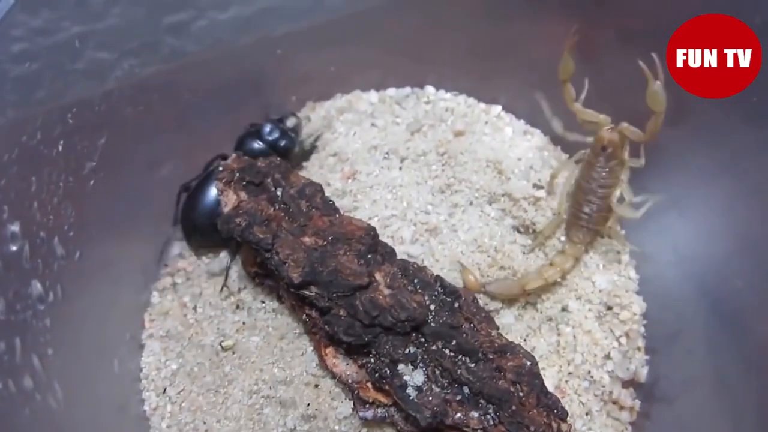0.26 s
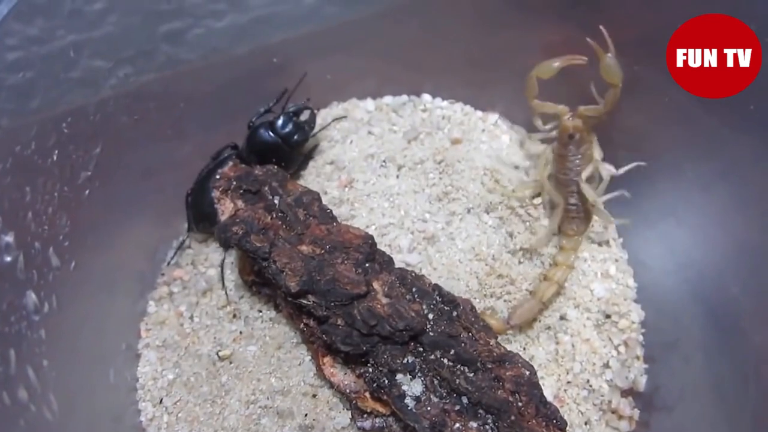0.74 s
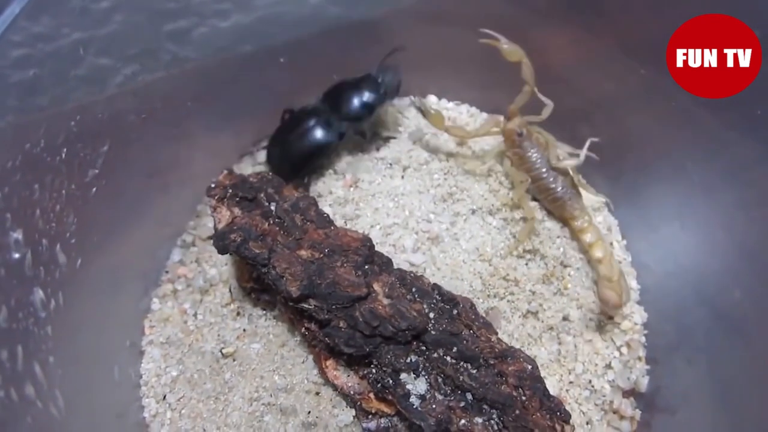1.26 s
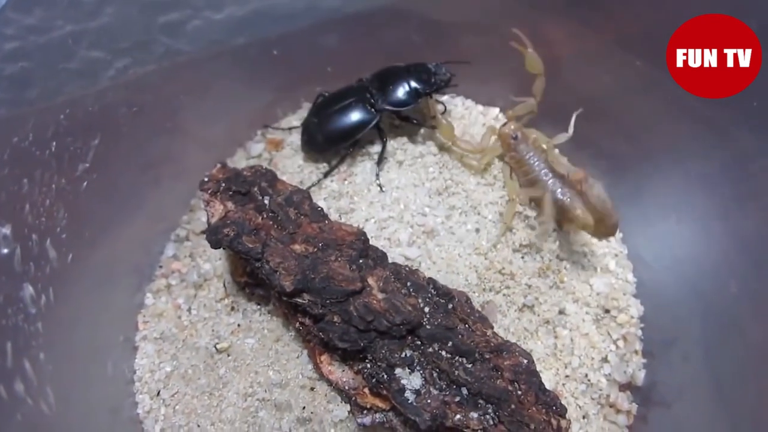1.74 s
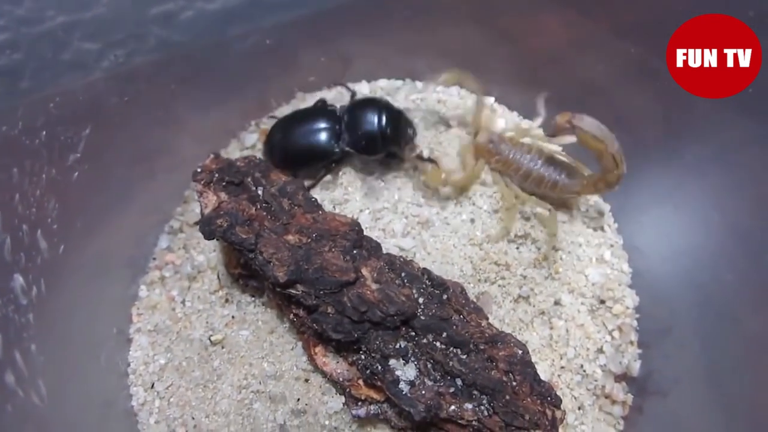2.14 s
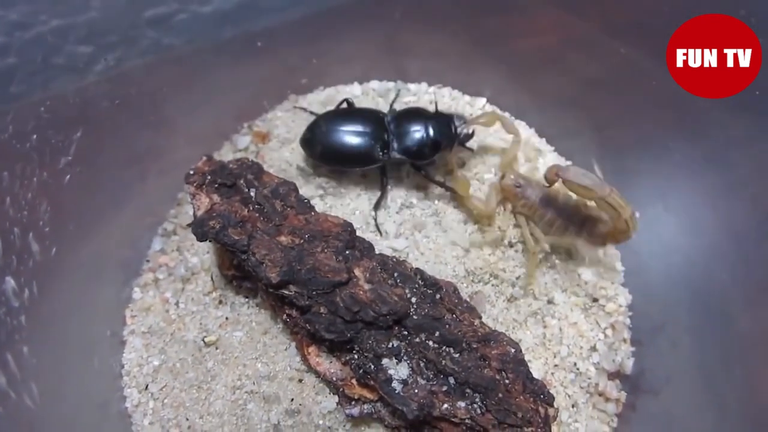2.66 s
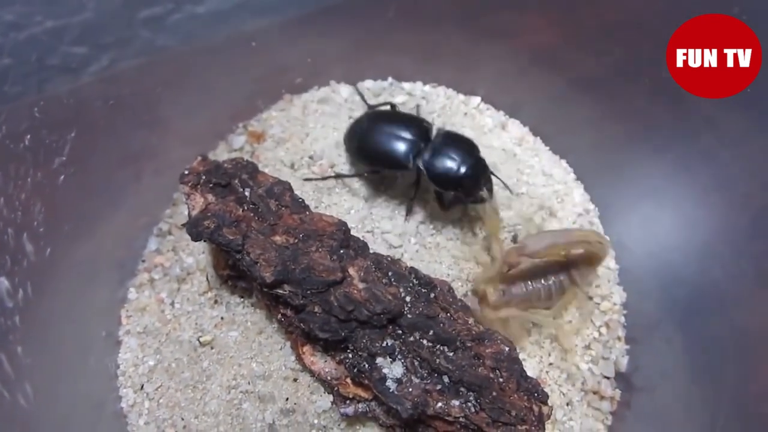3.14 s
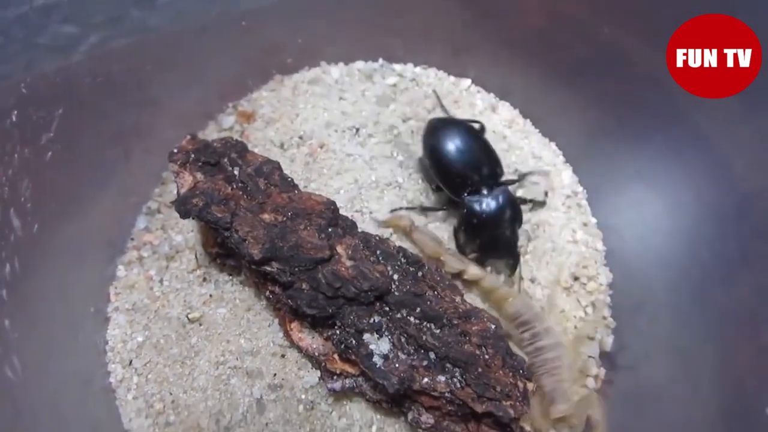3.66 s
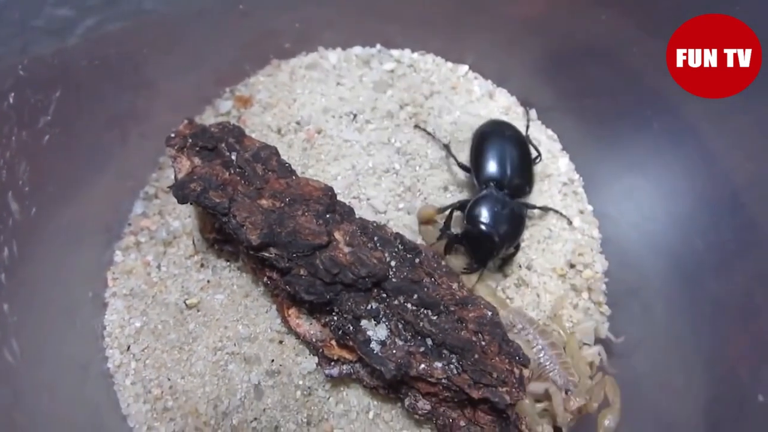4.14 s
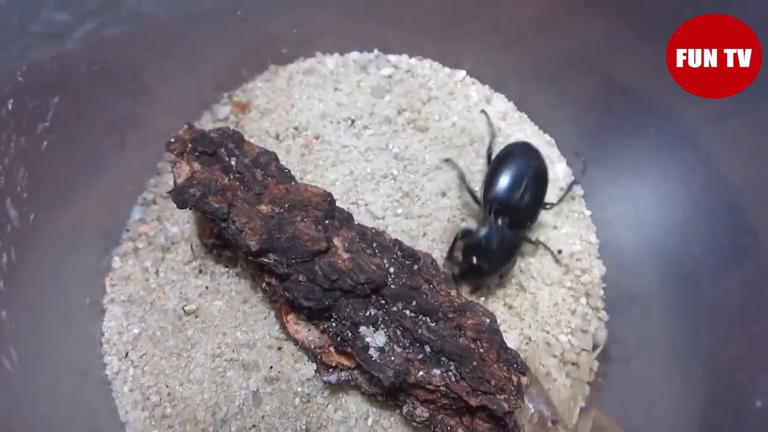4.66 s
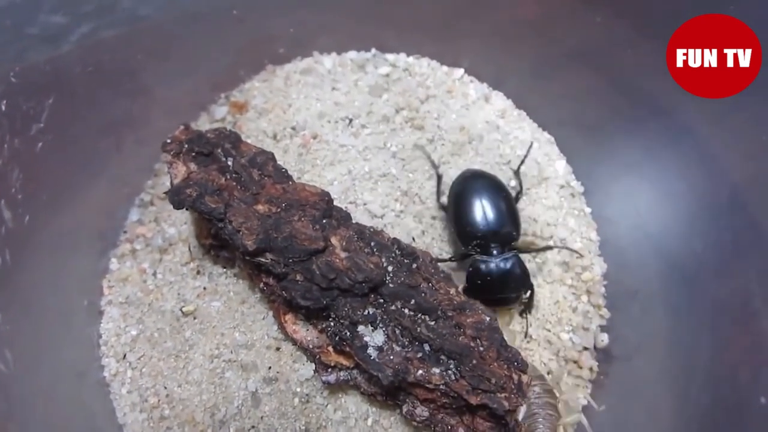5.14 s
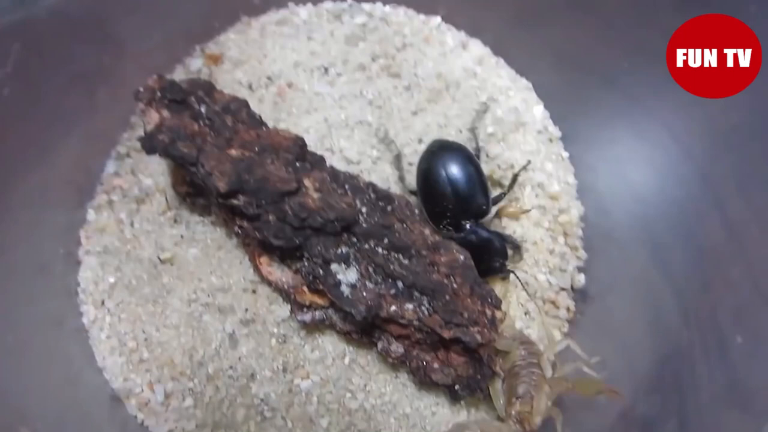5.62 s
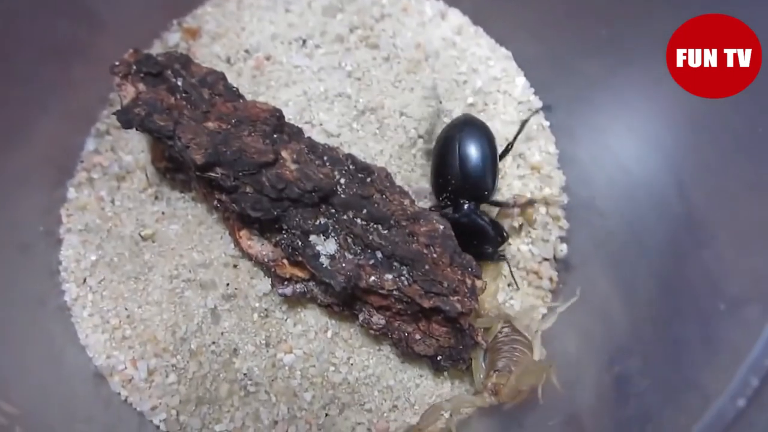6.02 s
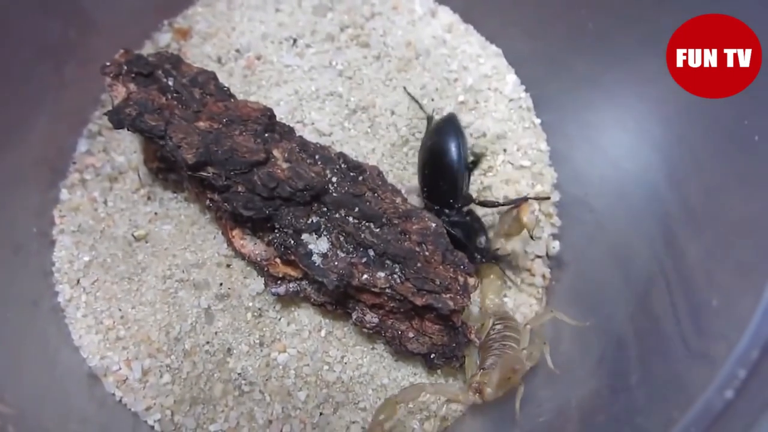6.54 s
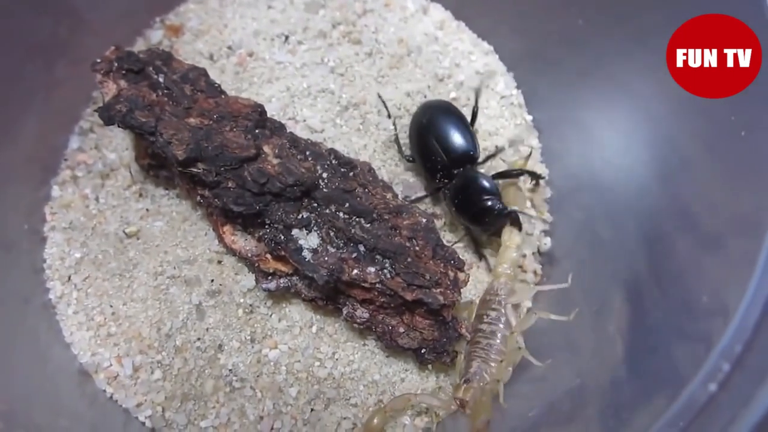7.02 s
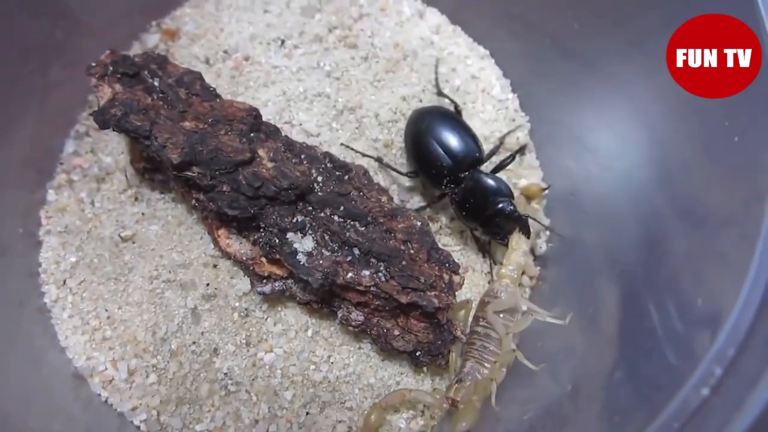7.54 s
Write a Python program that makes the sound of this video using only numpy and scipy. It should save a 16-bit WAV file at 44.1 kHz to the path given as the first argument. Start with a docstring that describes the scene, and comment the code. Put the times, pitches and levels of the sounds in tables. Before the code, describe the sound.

Tiny claws and hard shells tick, scrape and crackle in a rapid flurry, then sparser sandy scratches, above a soft boomy room drone.

```python
"""A plastic tub of sand in a small room, microphone close: a beetle on bark, then a scuffle with a scorpion.
Legs drag as clumps of tiny random slips; claws and shells tick as short decaying tones with a noisy rattle.
Random slips also make the crackle of the shuffling, the singing sand and the hollow rub of the bark.
Bumps ring the tub wall as decaying modes.
Behind, a fan's rush and boom and a little hiss are coloured noise, and an electric whine is wavering sines."""
import sys
import numpy as np
from scipy import signal
from scipy.fft import rfft, irfft, next_fast_len
from scipy.io import wavfile
from scipy.ndimage import uniform_filter1d, map_coordinates

SR = 44100
rng = np.random.default_rng(int(sys.argv[2]) if len(sys.argv) > 2 else 0)


def persist_wave(psi):
    """Save psi, clipped to +-1, as 16-bit WAV."""
    counts = np.round(np.clip(psi, -1, 1) * 32767).astype(np.int16)
    wavfile.write(sys.argv[1], SR, np.atleast_2d(counts).T)


N = 343098


def amp(db):
    """Decibels to gain."""
    return 10 ** (np.asarray(db) / 20)


def unit(x):
    """x at rms 1."""
    return x / np.sqrt(np.mean(x ** 2) + 1e-20)


def follow(points, s):
    """Value at time s on straight lines between (t/s, value) points."""
    return np.interp(s, *np.transpose(points))


def colour(points, hz):
    """Gain of (f/Hz, level/dB) points joined on a log frequency axis."""
    f, db = np.transpose(points)
    return amp(np.interp(np.log(hz + 1), np.log(f), db))


def peaks(modes, hz):
    """Gain of resonances (f/Hz, width/Hz, level/dB), each 6 dB down one width from its centre."""
    power = 0
    for centre, width, db in modes:
        power = power + (amp(db) / (1 + ((hz - centre) / width) ** 2)) ** 2
    return np.sqrt(power)


def filtered(x, response):
    """x times a response of frequency."""
    m = next_fast_len(len(x) + 4096)
    gain = response(np.fft.rfftfreq(m, 1 / SR))
    return irfft(rfft(x, m) * gain, m)[:len(x)]


def noise(response):
    """Coloured noise of rms 1."""
    return unit(filtered(rng.standard_normal(N), response))


def wobble(n, rate):
    """A smooth random curve, rate knots a second."""
    knots = rng.standard_normal(int(n * rate / SR) + 4)
    return map_coordinates(knots, [np.arange(n) * rate / SR])


def add(track, s, sound):
    """Mix a sound into the track at time s."""
    start = max(round(s * SR), 0)
    track[start:start + len(sound)] += sound[:len(track) - start]


def grit(n, rate, spread_db, rub):
    """Tiny slips of uneven size, rate a second at random moments, over a smooth rubbing share."""
    size = amp(spread_db * np.minimum(rng.exponential(size=n), 3))
    slips = (rng.random(n) < rate / SR) * size * rng.choice([-1, 1], n)
    return unit(unit(slips) + rub * rng.standard_normal(n))


def patchy(x, depth_db, size):
    """The contact point moves, so its resonances drift: random gain patches over pitch and time."""
    z = signal.stft(np.pad(x, (0, 256)), nperseg=256)[2]
    field = rng.standard_normal(z.shape)
    for _ in range(2):
        field = uniform_filter1d(field, size=4, axis=0)
        field = uniform_filter1d(field, size=size, axis=1, mode="wrap")
    return signal.istft(z * amp(depth_db * unit(field)), nperseg=256)[1][:len(x)]


# colour of a dry scratch: f/Hz, level/dB
SCRATCH_COLOUR = [(300, -37), (1000, -11.5), (1500, -28), (2000, -14), (3000, -3.5), (4000, -4.5),
                  (5200, -0.5), (6800, 0), (8200, -1.5), (9500, -4), (12000, -9), (15500, -19.5)]


def dry_scratch(hz):
    """A claw on bark or loose grains sounds over a broad band."""
    return colour(SCRATCH_COLOUR, hz)


# the tub floor ringing under the sand: f/Hz, width/Hz, level/dB
TUB_FLOOR = [(3830, 280, -3), (5100, 420, -2), (5730, 790, -4.5), (7100, 2300, -14), (9000, 1900, -16)]


def surface(dry_slips, floor_slips, share):
    """Some slips sound directly; the given share of the power rings the tub floor."""
    direct = unit(filtered(dry_slips, dry_scratch))
    ringing = unit(filtered(floor_slips, lambda hz: peaks(TUB_FLOOR, hz)))
    return np.sqrt(1 - share) * direct + np.sqrt(share) * ringing


# scraping leg strokes: t/s, length/s, level/dB, brightness/dB per octave,
# share through the sand (0-1, anything above counts as 1)
LEG_STROKES = [(0.004, 0.01, -54, -7, .1), (0.158, 0.014, -54, 0, 0.5), (0.23, .008, -53, -6, 0.3),
               (0.279, 0.019, -53.5, 1, .2), (0.307, 0.0064, -46, -11, 0), (0.319, 0.0061, -47, -5, 0.06),
               (0.394, 0.019, -58.5, -2, .1), (0.458, 0.052, -59, -5, .1), (0.538, 0.023, -47.5, 1, 0),
               (0.697, 0.1, -67.5, -1, 0.8), (0.924, 0.0099, -46, 1, 0.04), (0.964, 0.017, -47, 3, 0.4),
               (1.015, 0.033, -52, 4, 0), (1.055, 0.0077, -48, -3, 0.1), (1.067, .008, -53, -5, .2),
               (1.104, 0.014, -44, 6, 0), (1.127, 0.012, -43, 2, 0.4), (1.156, .014, -52, 2, .2),
               (1.203, 0.025, -41.5, 4, 0.1), (1.235, .016, -48, 1, 0.4), (1.273, .015, -50.5, 2, .2),
               (1.297, 0.0088, -41.5, 2.5, 0.2), (1.368, 0.0098, -48, -8, 0.2), (1.395, 0.013, -39, 0, .15),
               (1.411, .017, -38.5, 2.5, 0.1), (1.428, 0.021, -51, 3, 0.4), (1.493, 0.0056, -54, -3, 0.3),
               (1.522, 0.026, -44.5, 0, 0.1), (1.564, .012, -48.5, -3, 0.4), (1.59, 0.022, -39, -2, 0.15),
               (1.619, .007, -49, 2, 0.4), (1.636, .01, -56, -2, .2), (1.728, 0.012, -42, 8, 0),
               (1.745, .013, -41, 6.5, 0), (1.769, 0.031, -56.5, 13, 0), (1.888, 0.02, -42.5, 4, 0.24),
               (1.954, .025, -60, 0, .1), (2.032, .018, -65, -7, 0.2), (2.075, 0.032, -56, 2.5, 0),
               (2.245, 0.023, -57, 0, 0.2), (2.32, 0.032, -56, 5, 0.1), (2.557, 0.048, -58, -1, 0),
               (2.696, 0.1, -59.5, 1, 0.3), (2.854, 0.036, -58, 1, 0.4), (2.971, 0.066, -58, 6, 0),
               (3.114, 0.053, -58.5, 0, 0), (3.357, 0.038, -59, 3, 0.2), (3.673, 0.037, -55.5, -5, 0.7),
               (3.726, 0.076, -50, 5, 1.06), (3.84, 0.023, -56.5, -2, 0.5), (3.896, 0.012, -57, -5, 0),
               (3.954, 0.021, -61, -2, .3), (4.056, 0.036, -54, 3, 1.03), (4.101, 0.023, -45, 0, 1),
               (4.249, 0.034, -56.5, -1, 0.6), (4.38, 0.045, -66.5, 3, 1), (4.547, 0.022, -49.5, 7, 0.3),
               (4.568, .04, -61, 8, 0.5), (4.628, 0.031, -55, 8.5, 1.1), (4.695, .035, -60, -4, 0.7),
               (4.753, 0.034, -55.5, -4, 0.6), (4.947, 0.13, -51, -1, 0.65), (5.649, 0.042, -60, 3, 0.5),
               (5.727, 0.073, -64.5, -1, 1.1), (5.839, 0.053, -58.5, 7, 1.1), (6.092, 0.036, -50, -1, .85),
               (6.138, 0.073, -62.5, -11, 1), (6.311, 0.054, -57.5, 4, 0.95), (6.45, 0.11, -67, -9, .95),
               (6.76, 0.038, -54.5, 0, .85), (6.794, .045, -62, -11, 1), (7.027, 0.043, -56, 2, 0.2),
               (7.199, .015, -60, -25, 0), (7.294, 0.014, -46.5, -5, .2), (7.313, 0.065, -51, -1, 0.1),
               (7.459, 0.017, -55.5, 3, 0.3), (7.411, 0.036, -65, -21, 0.6), (7.539, .006, -52, 2, .1),
               (7.545, 0.0051, -35, 6.5, 0.08), (7.553, 0.0095, -50, 1, .2), (7.597, 0.015, -59, -8, 0.4),
               (7.664, 0.022, -61.5, 9, 0.4)]
# a claw dragged through sand sings a little: f/Hz, width/Hz, level/dB
CLAW_SINGING = [(5360, 670, -1)]
STROKE_LOW_HZ = 1500  # a thin leg radiates little below this


def strokes():
    """Each drag of a leg is a clump of slips that swells and dies away; a sharper claw makes it brighter."""
    out = np.zeros(N)
    for s, length, db, bright_db, share in LEG_STROKES:
        share = np.clip(share, 0, 1)
        # the stroke proper runs from phase 0 to 1, with its skirts either side
        phase = np.arange(int(3 * length * SR)) / SR / length - 1
        swell = 1 / (1 + np.abs((phase - .5) / 0.5) ** 4.4)
        # a claw catches and jerks on bark, but ploughs more evenly through sand
        jerk_db = (2.2 - 0.3 * share) * wobble(len(phase), 254)
        slips = grit(len(phase), rate=3200, spread_db=1.0, rub=0.25 + 0.5 * share)
        slips = slips * swell * amp(jerk_db)

        def claw(hz):
            """Tilt of the claw, its singing in sand and the thin leg's loss of bass."""
            octaves = np.log2(np.clip(hz, 4000, 12500) / 6000)
            singing = 1 + share * peaks(CLAW_SINGING, hz)
            bass_loss = hz ** 2 / np.hypot(hz ** 2, STROKE_LOW_HZ ** 2)
            return amp(bright_db * octaves) * singing * bass_loss

        scrape = filtered(surface(slips, slips, share), claw)
        sound = patchy(scrape, depth_db=3.5 - 0.78 * share, size=7)
        add(out, s - length, unit(sound) * amp(db))
    return out


# claws and shells striking hard: t/s, peak level of ring and rattle/dB before the bass cut, ring f/Hz,
# treble snap re that peak/dB, floor knock re that peak/dB (the knock is halved in the mix)
HARD_TICKS = [(.0096, -32, 5600, -10, -7), (0.0988, -37, 5640, -12, -17), (.1312, -37, 4200, -6, -6),
              (0.1615, -30, 5430, -16, -14), (0.231, -33, 4950, -12, -8), (.2735, -39, 6500, -8, -14),
              (0.307, -19.5, 5300, -16, -3), (0.3214, -25, 7550, 1, -8), (0.3776, -27, 5430, -16, -5),
              (.4983, -38, 5800, -10, -12), (0.5394, -29.5, 7700, -9, -12), (0.546, -33, 6500, -1, -16),
              (.7793, -39, 6040, -12, -14), (0.9058, -33.5, 5860, -16, -7), (0.9286, -29, 5460, -15, -12),
              (0.9357, -26.5, 5250, -18, -5), (0.9518, -24, 5400, -12, -14), (0.9632, -20.5, 6160, -4, -6),
              (.9765, -37, 4620, -12, -8), (1.0245, -34, 6000, -8, -14), (1.0352, -30, 6800, -6, -14),
              (1.057, -26, 5230, -14, -10), (1.1045, -28, 7200, -6, -16), (1.1088, -31, 7400, -5, -14),
              (1.1134, -24, 8300, 3, -14), (1.1203, -35, 8000, 9, -18), (1.1355, -27, 4900, -18, -12),
              (1.2105, -27.5, 5400, -14, -20), (1.2249, -27, 6340, -11, -17), (1.229, -20, 7100, -12, -18),
              (1.284, -31, 6600, -12, -16), (1.2955, -26, 5600, -16, -16), (1.3, -20, 6670, -11, -12),
              (1.3602, -15, 5000, -10, -14), (1.3612, -16, 6200, -10, -12), (1.3622, -24.5, 2700, -20, -12),
              (1.3685, -22, 4120, -15, -4), (1.3702, -25, 2450, -20, -10), (1.382, -27, 4870, -12, -14),
              (1.4, -18, 7100, -20, -16), (1.4125, -15, 6700, -17, -21), (1.418, -22, 6150, -12, -16),
              (1.5135, -30, 6000, -14, -16), (1.528, -26, 6940, -20, -18), (1.534, -28, 7500, -11, -16),
              (1.5445, -25, 6400, -14, -16), (1.5814, -17.5, 5070, -20, -21), (1.606, -20, 7300, -17, -17),
              (1.6432, -29, 5930, -15, -5), (1.7096, -32.5, 6200, 6, -14), (1.7175, -31.5, 5000, -10, -12),
              (1.7295, -30, 6800, 4, -20), (1.7324, -21.5, 7240, -7, -16), (1.7365, -28, 4550, -4, -16),
              (1.75, -24.5, 4640, 4, -16), (1.7545, -26, 6250, -3, -14), (1.7618, -25, 8000, 5, -20),
              (1.7675, -35, 7600, 6, -20), (1.777, -36, 7200, 3, -20), (1.7855, -43, 7200, 4, -20),
              (1.8113, -44, 7600, 8, -18), (1.8832, -26, 5100, -2, -12), (1.896, -28, 4850, -3, -12),
              (1.9025, -22.5, 4770, -1, -12), (1.906, -33, 4900, -6, -14), (1.915, -33, 5400, -3, -14),
              (1.9581, -32, 6200, -7, -16), (1.9792, -23.5, 4600, -12, -9), (2.0404, -36, 6000, -6, -12),
              (2.098, -40, 6000, 5, -12), (2.1874, -41, 5970, -1, -14), (2.269, -39, 6500, 7, -14),
              (2.3442, -35, 6450, 3, -12), (2.6107, -38, 5800, -1, -14), (2.8452, -33, 6060, -12, -17),
              (2.8736, -35, 5800, -10, -14), (2.8819, -34, 5600, -10, -14), (2.9265, -37, 6500, 5, -12),
              (2.9613, -36, 6200, -1, -14), (2.9882, -35.5, 6030, 7, -16), (3.0442, -36, 5840, -1, -14),
              (3.157, -31, 3300, -3, -6), (3.3817, -42, 7160, 11, -14), (3.6102, -16.5, 5300, -22, -10),
              (3.6427, -32, 5500, -11, -18), (3.7321, -33, 5250, 0, -14), (3.789, -27, 5350, -5, -16),
              (3.9614, -44, 5630, -3, -14), (4.011, -40, 7000, 2, -16), (4.0254, -35.5, 6800, 0, -16),
              (4.1128, -29, 5550, -17, -18), (4.119, -30, 5400, -18, -18), (4.2592, -37, 5560, 0, -14),
              (4.55, -23.5, 6850, 2, -20), (4.5625, -30, 6950, 0, -18), (4.585, -38, 7400, -2, -18),
              (4.595, -38, 5600, -3, -16), (4.606, -37, 7400, 4, -18), (4.613, -32, 6160, 0, -17),
              (4.6385, -33, 5600, -14, -18), (4.695, -39, 5600, -14, -16), (4.7128, -32, 5000, -16, -12),
              (4.726, -32, 5260, -14, -14), (4.7802, -36, 5560, 0, -14), (4.887, -37.5, 5940, -2, 12),
              (5.181, -35, 4920, -7, 1), (5.227, -39, 4400, -16, -14), (5.2567, -32.5, 5300, -11, -16),
              (5.2662, -32.5, 5100, -18, -16), (5.6754, -35, 5400, -1, -12),
              (5.7454, -33.5, 5430, -14, -18), (5.8097, -38, 5500, -10, -18), (5.8379, -33, 5500, -12, -18),
              (5.8454, -33, 5800, -12, -18), (6.0345, -34, 5800, 7, -12), (6.0405, -27.5, 5800, -4, -6),
              (6.1096, -32, 5000, -14, -12), (6.1994, -38, 5200, -12, -14), (6.2153, -33, 5000, -18, -14),
              (6.2313, -39.5, 7540, 13, -20), (6.2533, -43, 8010, 12, -20), (6.3584, -36, 5440, -12, -16),
              (6.4337, -33.5, 5260, -6, -14), (6.5203, -34, 5470, -4, -3), (6.6805, -38.5, 6230, -1, -16),
              (6.7477, -33.5, 5440, -14, -14), (7.0535, -37, 6800, 8, -10), (7.059, -28, 5600, -2, -10),
              (7.0902, -34, 5600, -6, -14), (7.2985, -32, 5750, -12, -8), (7.3042, -18, 5700, -2.5, -10),
              (7.342, -32, 5600, 5, -1), (7.4718, -34, 5400, -2, -10), (7.4765, -33, 5400, 5, -6),
              (7.546, -25.5, 3880, 6, -14), (7.5485, -24, 7760, 7.5, -14), (7.5545, -36, 3600, 2, -8),
              (7.559, -37, 6400, 2, -12)]
# ring of a claw or shell: multiple of its pitch, level/dB before scatter
SHELL_RING = [(1.003, 2), (1.32, -7.5), (1.7, -19)]
# the tub floor struck through the sand: f/Hz, level/dB before scatter, t60/s
FLOOR_KNOCK = [(2110, -10, 0.013), (3030, -44, 0.025), (3980, -16, 0.04), (5130, -30, .012)]
SHELL_TOP_HZ = 11500  # ring and rattle fall off above this
RATTLE_DB, RATTLE_T60_S = -25, .032  # the long tail of the rattle
RATTLE_RING_DB, RATTLE_RING_WIDTH_HZ = -2, 900  # the rattle is coloured by the shell that was struck


def ticks(contacts):
    """A hard contact: a sharp snap, the shell's short ring, a brief rattle and a knock on the tub floor."""
    out, t = np.zeros(N), np.arange(SR // 25) / SR
    lowpass = signal.butter(N=2, Wn=SHELL_TOP_HZ, fs=SR, output="sos")
    highpass = signal.butter(N=4, Wn=2200, btype="highpass", fs=SR, output="sos")

    def mode(hz, db, t60):
        """A sine that falls 60 dB in t60 seconds."""
        return np.sin(2 * np.pi * hz * t) * amp(db - 60 * t / t60)

    for s, db, ring_hz, snap_db, knock_db in contacts:
        ring = sum(mode(ring_hz * ratio, level + rng.normal(0, 1.6), 0.0055)
                   for ratio, level in SHELL_RING)
        snap_hz = 10800 * amp(rng.normal(0, 1.0))  # scatters by about 12 percent
        snap = mode(snap_hz, snap_db, 0.0017)
        knock = sum(mode(hz, knock_db + level + rng.normal(0, 0.87), t60)
                    for hz, level, t60 in FLOOR_KNOCK)
        # kicked grains rattle on for a moment
        resonance = [(1.3 * ring_hz, RATTLE_RING_WIDTH_HZ, RATTLE_RING_DB)]
        grains = filtered(rng.standard_normal(len(t)),
                          lambda hz: dry_scratch(hz) * (1 + peaks(resonance, hz)))
        burst = 0.35 * amp(-60 * t / 0.0039)
        tail = amp(RATTLE_DB - 60 * t / RATTLE_T60_S + 8.2 * wobble(len(t), 580))
        rattle = unit(grains) * (burst + tail)
        body = signal.sosfilt(lowpass, 0.68 * ring + rattle)
        body = body / np.abs(body).max()
        add(out, s, amp(db) * (body + .5 * knock + snap))
    # such small bodies radiate almost no bass
    return signal.sosfilt(highpass, out)


# how hard the animals shuffle between the strokes: t/s, effort/dB
SHUFFLE_EFFORT = [(0.0, -56), (0.37, -54), (0.59, -65.5), (0.89, -59), (0.95, -47.5), (1.13, -53),
                  (1.58, -50.5), (1.67, -64), (1.85, -65), (2.08, -62.5), (2.64, -67.5), (2.9, -57),
                  (3.31, -71.5), (3.88, -61), (4.44, -62.5), (4.7, -60), (5.46, -65.5), (5.7, -61),
                  (6.3, -63.5), (6.95, -65), (7.21, -57.5), (7.78, -65)]


def effort_db(s):
    """How hard the animals shuffle at time s."""
    return follow(SHUFFLE_EFFORT, s)


STEPS_PER_S, STEP_DB, STEP_SCATTER_DB = 7, 11.5, 4  # peak over the effort, scattered either way
STEP_RING_HZ, STEP_SNAP_DB, STEP_KNOCK_DB = 5500, -9, -12  # ring and snap are centres of their scatter


def footfalls():
    """Light contacts at random moments, louder with effort, as rows for ticks()."""
    gap, strength, pitch, snap = rng.random((200, 4)).T
    times = np.cumsum(-np.log(1 - gap)) / STEPS_PER_S
    peak_db = effort_db(times) + STEP_DB + STEP_SCATTER_DB * (2 * strength - 1)
    ring_hz = STEP_RING_HZ * 2 ** (.35 * (pitch - .5))
    snap_db = STEP_SNAP_DB + 16 * (snap - .5)
    knock_db = np.full_like(times, STEP_KNOCK_DB)
    rows = np.column_stack([times, peak_db, ring_hz, snap_db, knock_db])
    return rows[times < N / SR]


# how much of the shuffling goes through the sand into the tub floor: t/s, share (0-1)
SAND_FOOTING = [(0, 0.05), (3.1, 0.55), (3.7, 0.62), (6.95, 1), (7.4, 0.8)]


def footing(s):
    """Share of the shuffling that goes through the sand at time s."""
    return np.clip(follow(SAND_FOOTING, s), 0, 1)


SHUFFLE_DB = 1  # the crackle over the effort
GAIT_PER_S, GAIT_DB = 14, 1.5  # the crackle swells and sinks from step to step


def shuffle():
    """Small steps keep the surface crackling between the strokes."""
    t = np.arange(N) / SR
    gait_db = GAIT_DB * wobble(N, GAIT_PER_S) + 3.1 * wobble(N, 90)
    level_db = effort_db(t) + SHUFFLE_DB + gait_db
    claws = grit(N, rate=1300, spread_db=1.5, rub=.5)
    sand = grit(N, rate=300, spread_db=9.0, rub=0.84)
    crackle = patchy(surface(claws, sand, footing(t)), depth_db=1.5, size=14)
    return amp(level_db) * unit(crackle)


# legs keep ploughing while the two push against each other: t/s, level/dB before the jerks
SAND_PLOUGH = [(5.3, -85), (5.44, -59), (5.53, -67), (5.75, -59), (5.87, -65), (5.97, -68), (6.18, -60),
               (6.27, -67), (6.36, -66), (6.62, -66), (6.72, -71), (6.82, -62), (6.97, -82)]
# the sand sings in a narrow band: f/Hz, width/Hz, level/dB
SAND_SINGING = [(5130, 380, -2), (5600, 520, -4)]
PLOUGH_SLIPS_PER_S, PLOUGH_JERK_DB = 900, 2


def plough():
    """Fine, dense slips of sand under a pushing leg keep one narrow band singing."""
    times, levels = np.transpose(SAND_PLOUGH)
    level_db = np.interp(np.arange(N) / SR, times, levels, left=-120, right=-120)
    slips = grit(N, rate=PLOUGH_SLIPS_PER_S, spread_db=6, rub=.5)
    slips = slips * amp(PLOUGH_JERK_DB * wobble(N, 160))
    return amp(level_db) * unit(filtered(slips, lambda hz: peaks(SAND_SINGING, hz)))


# the bark rubs dully as the beetle climbs on it: t/s, level/dB
BARK_RUB = [(0, -58), (.3, -60.5), (.55, -64), (.9, -100), (1.05, -63), (1.35, -60.5), (1.6, -78),
            (2.0, -90)]
# hollow resonances of the bark: f/Hz, width/Hz, level/dB
BARK_HOLLOW = [(940, 490, -3), (2740, 670, -3)]


def bark():
    """The beetle's weight rubs the bark, which answers with a faint, even, hollow rustle."""
    level_db = follow(BARK_RUB, np.arange(N) / SR)
    slips = grit(N, rate=1200, spread_db=3, rub=1) * amp(1.5 * wobble(N, 25))
    return amp(level_db) * unit(filtered(slips, lambda hz: peaks(BARK_HOLLOW, hz)))


# a body bumps the tub wall: t/s, level/dB added to every mode
WALL_BUMPS = [(1.36, -34), (1.3687, -30), (3.158, -42), (7.304, -38)]
# modes of the plastic wall: f/Hz, level/dB before scatter, t60/s
WALL_MODES = [(960, -14, .03), (1900, -3.5, 0.026), (2140, -6.5, 0.023), (3140, -23, 0.023),
              (3600, -3, 0.017), (4130, -4, 0.024)]
WALL_SCATTER_DB = 2


def bumps():
    """Each bump rings the plastic wall at slightly new strengths."""
    out, t = np.zeros(N), np.arange(SR // 12) / SR
    onset = 1 - np.exp(-t / 0.00068)
    for s, db in WALL_BUMPS:
        ring = np.zeros(len(t))
        for hz, level, t60 in WALL_MODES:
            decay = amp(level + rng.normal(0, WALL_SCATTER_DB) - 60 * t / t60)
            ring += decay * np.sin(2 * np.pi * hz * t)
        add(out, s, amp(db) * ring * onset)
    return out


# colour of the fan's broad rush: f/Hz, level/dB
FAN_RUSH = [(20, -12), (50, -2), (70, -0.5), (110, -5.5), (210, 1.5), (290, -3), (330, -5), (400, -9),
            (450, -13.5), (600, -16.5), (1000, -19.5), (1600, -21), (2500, -26), (5000, -39.5)]
# room resonances that the fan drives: f/Hz, width/Hz, level/dB
ROOM_BOOM = [(107, 3, -6), (132, 13, 0), (153, 12, -2.5), (177, 6, -1.5), (192, 10, -3), (222, 7, -9.5),
             (235, 5, -11), (262, 9, -4.2), (302, 7, -15), (357, 10, -20), (473, 9, -24), (528, 11, -20)]
# colour of the hiss above the rush: f/Hz, level/dB
HISS_COLOUR = [(500, -8), (2200, -1), (4200, 0), (5400, 1), (7000, 0), (9000, -2), (11500, -5.5),
               (13500, -9.5), (15500, -15.5)]


def background():
    """The fan's broad rush and the room's resonant boom are separate noises; hiss and whine lie far below."""
    rush = amp(-51) * noise(lambda hz: colour(FAN_RUSH, hz))
    boom = amp(-43.5) * noise(lambda hz: peaks(ROOM_BOOM, hz))
    steady_hiss = noise(lambda hz: colour(HISS_COLOUR, hz))
    hiss = amp(-64.5) * patchy(steady_hiss, depth_db=3.0, size=20)
    return rush + boom + hiss + whine()


# thin electric whine: f/Hz, rms level/dB
WHINE_TONES = [(7875, -72.5), (13500, -86)]
WHINE_WAVER_HZ = 14


def whine():
    """Thin tones of steady level that waver a little in pitch."""
    out = np.zeros(N)
    for hz, db in WHINE_TONES:
        pitch_hz = hz + WHINE_WAVER_HZ * wobble(N, 60)
        out += amp(db) * np.sqrt(2) * np.sin(2 * np.pi * np.cumsum(pitch_hz) / SR)
    return out


def scene():
    """The animals close to the microphone, the room behind them."""
    contacts = strokes() + ticks(HARD_TICKS) + ticks(footfalls())
    rubbing = shuffle() + plough() + bark()
    return (contacts + rubbing + bumps() + background())[None]


TOP_HZ = 15850


def record(dry):
    """The camera's microphone track keeps nothing above its band limit."""
    return np.array([filtered(channel, lambda hz: hz < TOP_HZ) for channel in dry])


dry = scene()
out = record(dry)
persist_wave(out)
```